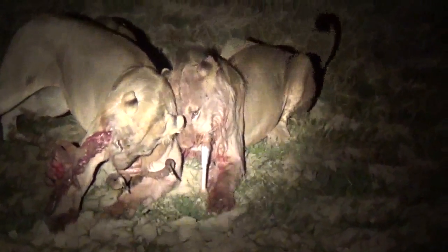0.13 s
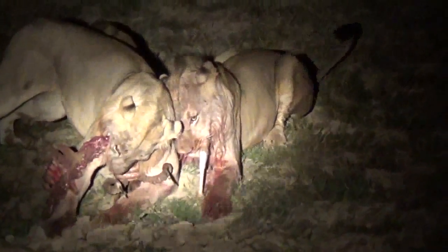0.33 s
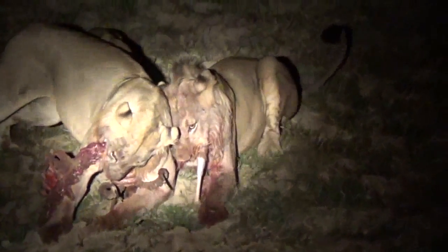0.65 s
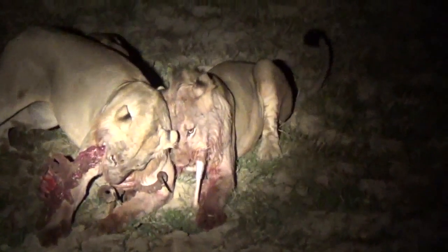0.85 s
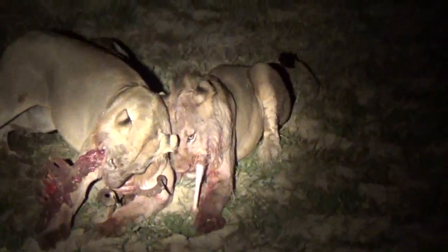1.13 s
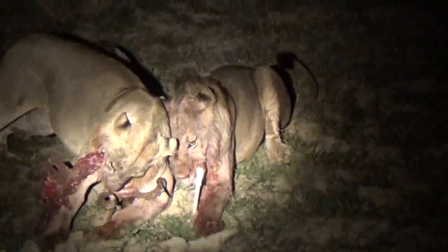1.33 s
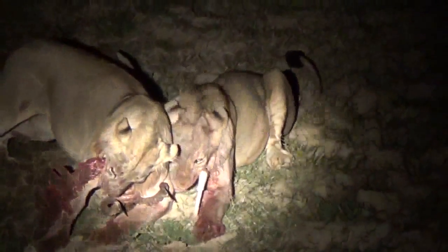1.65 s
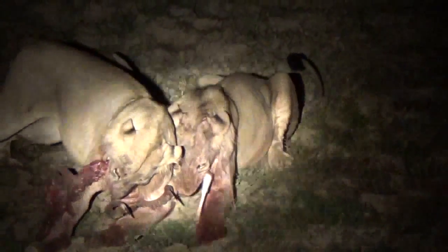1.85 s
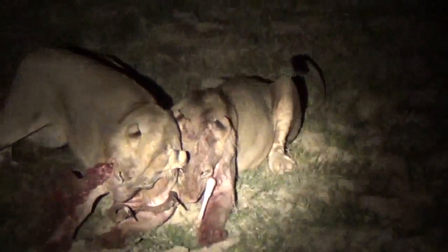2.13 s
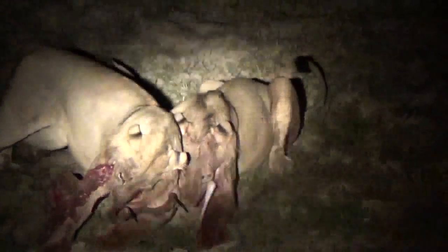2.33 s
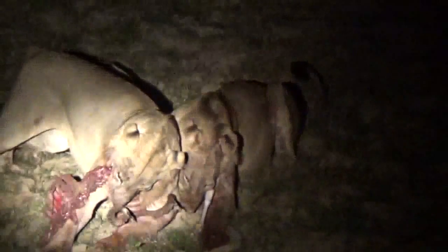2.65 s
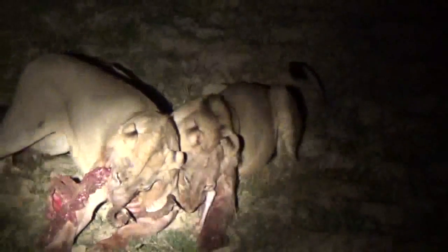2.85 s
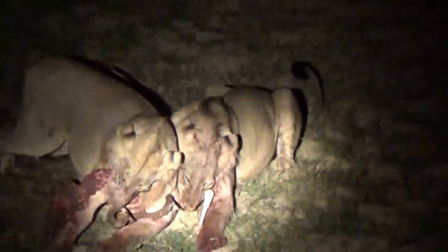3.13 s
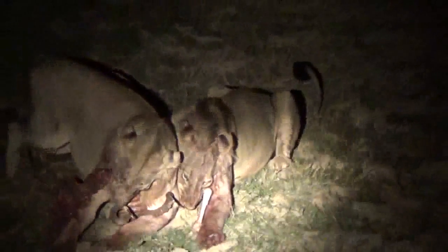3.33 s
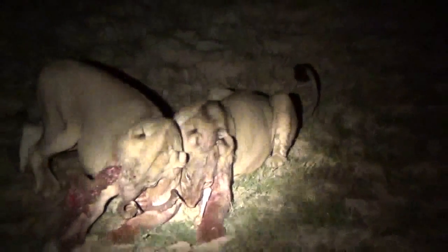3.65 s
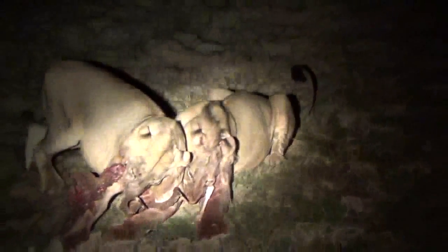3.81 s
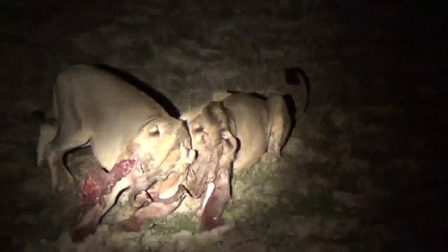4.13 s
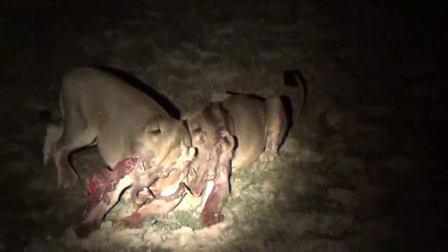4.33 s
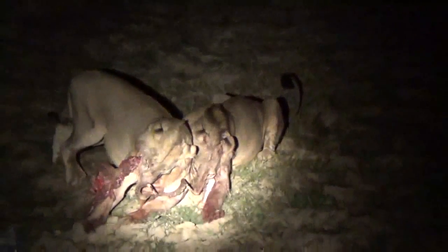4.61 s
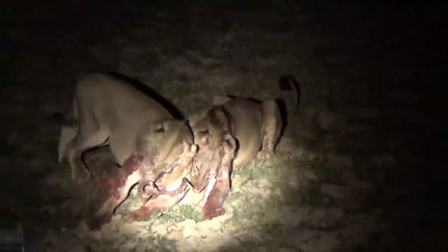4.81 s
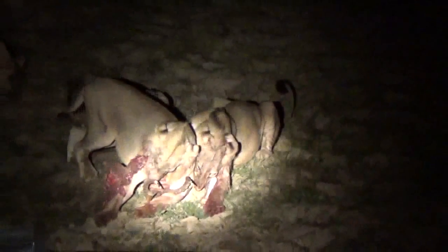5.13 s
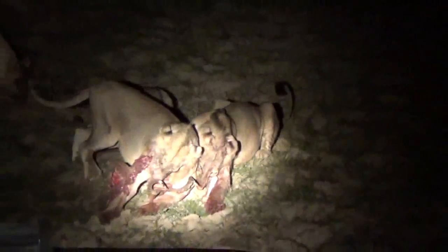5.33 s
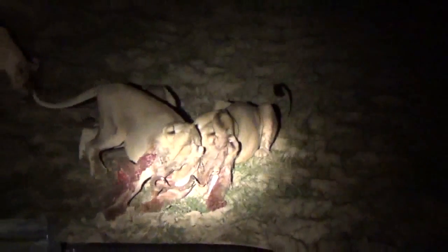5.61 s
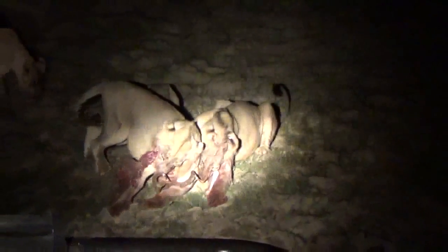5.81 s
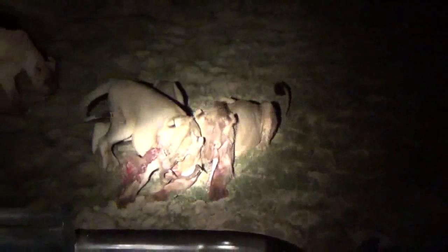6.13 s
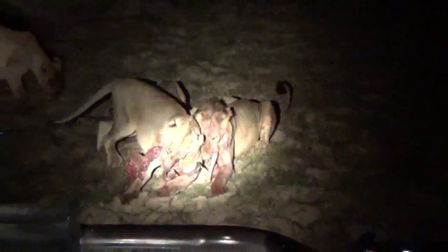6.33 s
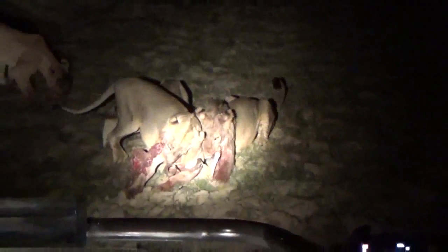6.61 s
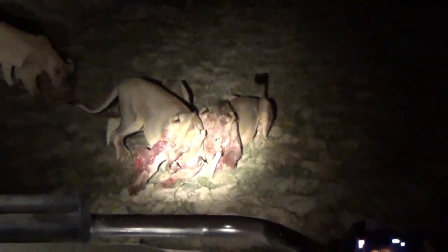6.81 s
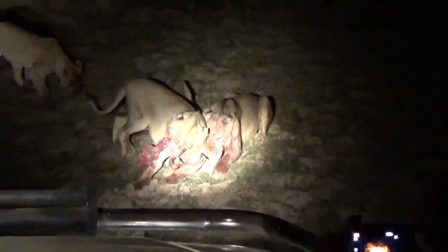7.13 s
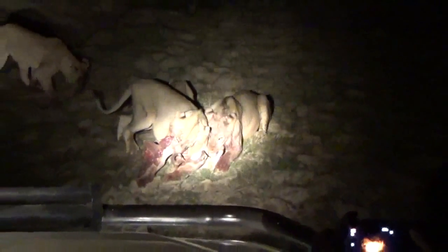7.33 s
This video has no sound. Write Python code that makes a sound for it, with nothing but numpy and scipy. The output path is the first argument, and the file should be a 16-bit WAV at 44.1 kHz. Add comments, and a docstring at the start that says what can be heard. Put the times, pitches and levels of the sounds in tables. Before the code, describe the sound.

Night in open grassland, two lions feeding straight ahead a few metres from a stereo microphone. A low rattling growl, about 26 pulses a second, fades by 0.6 s, with wet mouth pops and a crisp crack at 0.25 s. The loudest bone crack snaps at about 0.95 s, followed by a soft low grunt. From 1.9 to 3.1 s a deep, chesty growl swells and dies away. A small pop comes near 3.5 s, then scuffing and faint jaw clicks around 4 to 4.2 s. Another growl builds from 4.3 s into a short rough snarl with a thin whine at 5.2 to 5.5 s, ending in a tiny grunt. Duller bone cracks follow at 5.85 and 6.25 s, with a weak growl from 6.4 s to the end near 7.3 s. Throughout, a near cricket chirps upward at left about every 0.4 s, others chirp and trill, and high insect buzzing pulses over faint air.

```python
"""Two lions feed on one carcass in open grassland at night, straight ahead and a few metres away.
Slapping vocal folds excite chest and throat in slow growls; one short snarl adds a thin whine.
Bone cracks ring as noise bursts through resonances, mouths pop and grunt as gliding tones.
All around, crickets trill and chirp as wavering tones; a bush cricket buzzes in bouts of pulsing
noise above them, over a blur of far insects and faint night air."""
import sys
import numpy as np
from scipy import signal
from scipy.fft import rfft, irfft, next_fast_len
from scipy.io import wavfile
from scipy.ndimage import uniform_filter1d

SR = 44100
rng = np.random.default_rng(int(sys.argv[2]) if len(sys.argv) > 2 else 0)


def generate_wav(sig):
    """Save sig (samples, or channels by samples) to the path in sys.argv[1] as 16-bit PCM at SR."""
    pcm = np.round(np.clip(np.atleast_2d(sig).T, -1, 1) * 32767).astype(np.int16)
    wavfile.write(sys.argv[1], SR, pcm)


N = 328986
TIME = np.arange(N) / SR

# growls: first slap t/s, end t/s, first and last slap rate f/Hz, then belly, chest, throat rasp level/dB
GROWLS = [(-0.063, 0.57, 26.1, 35.2, -47, -47.5, -59.5), (0.721, 0.92, 27, 27, -66, -71, -75),
          (1.32, 1.86, 25, 23, -57.5, -66, -65.5), (1.936, 3.071, 27.2, 22, -46.5, -40, -53.7),
          (3.86, 4.47, 24.5, 24.5, -55, -59.5, -61.5), (4.313, 5.079, 24.5, 22.4, -49.5, -45, -57),
          (6.45, 7.248, 23, 21.4, -64, -66.5, -71)]
# resonances of the lion's body: f/Hz, width f/Hz, level/dB
BELLY_MODES = [(55.4, 34, -6), (76, 13, -13), (104.3, 11, -8)]
CHEST_MODES = [(163.7, 27, 1), (201.5, 40, 3), (215.4, 19, 1.5)]
THROAT_MODES = [(460, 244, 0.5), (1264, 50, -4), (1535, 220, 0.5), (1950, 390, 1), (2113, 110, 4),
                (3020, 440, -11.5)]
# short knock of the windpipe at each slap: f/Hz, width f/Hz, level/dB
WINDPIPE_MODES = [(330, 86, -1), (431, 60, -2)]
# mouth opened for the snarl: f/Hz, width f/Hz, level/dB
SNARL_MOUTH_MODES = [(437, 100, 2), (603, 89, 3.5), (920, 57, -0.5), (1206, 78, 2.5), (1440, 210, -1.5),
                     (2020, 380, -18)]
# course of the snarl, levels before the surges: t/s, mean voice pitch f/Hz, chest level/dB, mouth level/dB
SNARL_COURSE = [(5.155, 95.9, -77, -71), (5.18, 96.1, -62, -59), (5.22, 91.9, -54, -52.5),
                (5.26, 77, -50, -55.5), (5.33, 82, -49, -58.5), (5.38, 80, -53, -52.5),
                (5.41, 75.1, -59, -61), (5.501, 70, -57, -67.5)]
# whine that breaks out of the snarl: t/s, mean pitch f/Hz, level/dB
WHINE_COURSE = [(5.23, 587, -68), (5.29, 593, -52.5), (5.315, 640, -50), (5.34, 615, -54), (5.36, 613, -66),
                (5.376, 595, -46), (5.39, 600, -48), (5.405, 552, -64), (5.43, 555, -68)]
# soft closed-mouth grunts: t/s, length t/s, start f/Hz, end f/Hz, level/dB at the middle
GRUNTS = [(1.15, 0.18, 114, 91.4, -56), (5.499, 0.026, 127, 99, -44.5)]
# wet pops of the mouth: t/s, length t/s, start f/Hz, end f/Hz, level/dB at the middle
POPS = [(0.055, 0.022, 660, 627, -54.5), (0.25, 0.03, 695, 613, -53.5), (0.455, 0.021, 593, 583, -57),
        (3.457, 0.02, 556, 497, -54.5)]
# bone cracks and jaw smacks: t/s, crack peak level/dB, crumbling decay t/s, main ring f/Hz,
# top edge f/Hz, low thud level/dB re crack peak, bright fracture level/dB re splinters
BITES = [(0.248, -26, 0.0012, 2450, 15000, -26, 3), (0.962, -17.5, 0.0022, 864, 15000, -42, -12.5),
         (3.128, -43.5, 0.0069, 1800, 2500, -28, -9), (4.166, -40, 0.00092, 1700, 4000, -25, -11),
         (4.184, -40, 0.00077, 1600, 4000, -20, -9), (4.24, -44.5, 0.00059, 1400, 3500, -15, -9),
         (5.101, -38.5, 0.0026, 440, 940, -3, -9), (5.127, -46, 0.0013, 1900, 2500, -18, -9),
         (5.136, -44, 0.0024, 1750, 2500, 1.5, -9), (5.848, -34, 0.0042, 1320, 6050, -21, -6),
         (6.244, -32, 0.0098, 1760, 4230, -6.5, -7)]
# ring of bone and mouth: f/Hz, width f/Hz, level/dB
BONE_MODES = [(720, 480, -9.5), (1130, 490, -7.5), (1580, 260, -6.5), (2070, 205, -2.5), (2960, 280, -4),
              (3550, 280, -11), (5250, 1700, -17), (9800, 3200, -17.5)]
# paws and bodies shifting in the grass: t/s, length t/s, centre f/Hz, level/dB
SCUFFS = [(3.979, 0.17, 476, -63), (4.112, 0.17, 357, -60), (5.05, 0.12, 386, -56),
          (5.722, 0.19, 704, -63.5), (6.227, 0.13, 290, -58), (6.422, 0.7, 286, -69),
          (7.281, 0.19, 590, -61)]
# evenly spaced chirps; levels are sine peaks before swell, flicker, echo and panning
# near cricket with an upward chirp, timed at its start; it hurries a little towards the end:
# first t/s, last t/s, period t/s, level/dB
RISING_CHIRPS = [(0.0, 5.585, 0.4, -51.5), (5.98, 7.135, 0.387, -51.5)]
# farther cricket on a level note, timed at its middle: first t/s, last t/s, period t/s, level/dB
LEVEL_CHIRPS = [(0.10, 1.79, 0.42, -56.5), (2.195, 7.255, 0.42, -54.5)]
# farther cricket whose note droops, timed at its middle; it rests between two runs:
# first t/s, last t/s, period t/s, level/dB
DROOPING_CHIRPS = [(0.105, 1.71, 0.4, -54.5), (5.125, 6.77, 0.41, -55.5)]
# trilling tree crickets: mean f/Hz, mean pulse rate f/Hz, level/dB before the common trim
TRILLS = [(2325, 38.5, -65.5), (2386, 45, -63.5), (2424, 43, -63), (2464, 52, -63)]
# bouts of the bush cricket: start t/s, end t/s
BUZZ_BOUTS = [(-0.25, 0.58), (0.6, 1.48), (1.63, 2.42), (2.42, 3.35), (3.4, 4.12), (4.22, 5.17),
              (5.08, 5.94), (6.02, 6.78), (6.85, 7.6)]
# relative spectra of bush cricket, far insects, far crickets and night air: f/Hz, level/dB per Hz
BUZZ_SPECTRUM = [(7500, -20.5), (9000, -8), (9700, -2.5), (10300, 4), (11100, 2), (12000, -20)]
CHORUS_SPECTRUM = [(4800, -29), (5700, -4), (6250, 3), (6800, -0.5), (7500, -5.5), (8500, -26)]
FAR_CRICKETS_SPECTRUM = [(2000, -31), (2250, -2.5), (2450, 4.5), (2650, -21.5), (3050, -14.5),
                         (3350, -17.5), (3650, 0.5), (3950, 0), (4200, -5), (4500, -14.5), (5200, -31)]
NIGHT_SPECTRUM = [(20, -29), (50, 0.5), (110, -1.5), (220, 3.5), (400, -1), (750, 0), (1200, -5),
                  (1900, -7), (3000, -6), (5000, -9), (8500, -13.5), (11500, -13)]
# likeness of left and right in sound from all around: f/Hz, likeness (0 to 1)
LIKENESS = [(30, .999), (150, 0.84), (300, 0.64), (600, 0.15), (2000, 0.17), (4000, 0.69), (6500, 0.62),
            (9000, 0.73), (10500, 0.84)]

# the air starts to flow this long before the first slap
GROWL_LEAD_S = 0.088
# (attack s, steepness of the fade); the chest comes last and goes first
BELLY_SWELL, CHEST_SWELL, RASP_SWELL = (0.23, 1.65), (0.35, 2.64), (0.18, 0.85)
# the rattle stumbles once in the loudest growl, skipping a share of a cycle
STUMBLE_AT_S, STUMBLE_CYCLES = 2.215, 0.24
# the snarl surges at the pace of the growl's rattle
SURGE_AT_S, SURGES_PER_S = 5.218, 25.3
BUZZ_DB, BUZZ_BETWEEN_DB, BUZZ_ATTACK_S, BUZZ_RELEASE_S = -64, -74, 0.29, 0.14
# the far insect chorus wavers about a steady level
CHORUS_DB, CHORUS_WAVER_DB, CHORUS_WAVERS_PER_S = -64, 1.5, 10
CUTOFF_HZ = 11040


def growls(jitter_s=0.0006, uneven_db=1.5, flutter_db=-7, belly_flutter_db=-7, rebound_s=0.01362,
           rebound_db=-11.5, puff_s=0.0023, leak=1.2, throat_shift=0.057, knock_db=-24):
    """Slack vocal folds slap shut; each slap thumps belly, chest and windpipe and puffs air in the throat."""
    slaps, rebounds, puffs = np.zeros((3, N))
    t = TIME[:SR // 30]
    for s in slap_times():
        late, strong, shift, bounce = rng.standard_normal(4)
        s = s + jitter_s * late
        gain = from_db([uneven_db * strong])
        add(slaps, s, gain)
        # the folds touch again more lightly within each cycle
        add(rebounds, s + rebound_s, gain * from_db(rebound_db + 2.3 * bounce))
        # the soft throat has a slightly different shape at every puff
        throat = np.array(THROAT_MODES) * [np.exp(throat_shift * shift), 1, 1]
        puff = rng.standard_normal(len(t)) * t * np.exp(-t / puff_s)
        add(puffs, s, gain * rms_one(resonate(puff, throat)))
    belly_gain = growl_gain(BELLY_SWELL, column=4)
    chest_gain = growl_gain(CHEST_SWELL, column=5)
    rasp_gain = growl_gain(RASP_SWELL, column=6)

    # loose tissue flutters between the slaps, the more so when the growl is weak
    slack = np.clip((from_db(-43) / (chest_gain + 1e-6)) ** 0.6, 0.7, 3)
    flutter, hiss = rng.standard_normal((2, N))
    thumps = rms_one(slaps)
    belly = resonate(thumps + from_db(belly_flutter_db) * slack * flutter, BELLY_MODES)
    belly = cut(cut(belly, 37, "high", order=4), 127, "low")
    chest = resonate(rms_one(slaps + rebounds) + from_db(flutter_db) * slack * flutter, CHEST_MODES)
    chest = cut(chest, 259, "low", order=5)
    rasp = cut(rms_one(puffs) + leak * rms_one(resonate(hiss, THROAT_MODES)), 2470, "low")
    knock = resonate(thumps + from_db(flutter_db) * flutter, WINDPIPE_MODES)
    knock = cut(cut(knock, 190, "high"), 590, "low", order=4)
    chest_and_knock = evened(chest, 0.082) + from_db(knock_db) * evened(knock, 0.12)
    # belly and chest move in the opposite direction to the rasp
    return rasp_gain * evened(rasp, 0.071) - belly_gain * evened(belly, 0.06) - chest_gain * chest_and_knock


def slap_times():
    """The rattle's pace glides evenly through a growl, until it ends or the next one takes over."""
    times = []
    next_starts = [row[0] for row in GROWLS[1:]] + [np.inf]
    for (start, end, first_rate, last_rate, *_), next_start in zip(GROWLS, next_starts):
        span = np.arange(start, end, 1 / SR)
        cycles = np.cumsum(np.linspace(first_rate, last_rate, len(span))) / SR
        cycles += STUMBLE_CYCLES * (start < STUMBLE_AT_S) * (span > STUMBLE_AT_S)
        slaps = span[np.diff(np.floor(cycles), prepend=-1) > 0]
        times.extend(slaps[(slaps > 0) & (slaps < next_start - 0.5 / last_rate)])
    return times


def growl_gain(shape, column):
    """Every growl swells quickly and fades as the air runs out; overlapping growls add in power."""
    attack_s, fade = shape
    power = 0
    for row in GROWLS:
        onset, end = row[0] - GROWL_LEAD_S, row[1]
        spent = np.clip((TIME - onset) / (end - onset), 0, 1)
        swell = ramp((TIME - onset) / attack_s) * (1 - spent ** 2) ** fade
        power = power + (from_db(row[column]) * swell / swell.max()) ** 2
    return np.sqrt(power)


def snarl(rough=0.13, breathy=2.2, whine_rough=0.0498, overtone_db=-14, chest_surge_db=6, mouth_surge_db=3):
    """The folds tighten to a ragged low note, the mouth opens on it and a thin whine rides on top."""
    s, hz = np.array(SNARL_COURSE)[:, :2].T
    cycles = np.cumsum(np.interp(TIME, s, hz) * (1 + rough * drift(90))) / SR
    pulses = rms_one(np.diff(np.floor(cycles), prepend=0)) * from_db(2.5 * drift(86))
    # breath noise pulses with the folds
    air = rng.standard_normal(N) * (1 + np.cos(2 * np.pi * cycles) / 2)
    chest = resonate(pulses + 0.68 * air, [(81, 31, 8.5), (240, 74, -6.5)])
    chest = evened(cut(chest, 330, "low"), 0.025)
    mouth = resonate(pulses / 2 + breathy * air, SNARL_MOUTH_MODES)
    mouth = evened(cut(mouth, 2300, "low"), 0.018)

    s, hz = np.array(WHINE_COURSE)[:, :2].T
    phase = 2 * np.pi * np.cumsum(np.interp(TIME, s, hz) * (1 + whine_rough * drift(200))) / SR
    whine = np.sin(phase) + from_db(overtone_db) * np.sin(2 * phase)
    whine = whine * (1 + 0.15 * np.cos(2 * np.pi * cycles))

    surge = np.cos(2 * np.pi * SURGES_PER_S * (TIME - SURGE_AT_S))
    chest = chest * from_db(chest_surge_db * surge) * level_curve(SNARL_COURSE, column=2)
    mouth = mouth * from_db(mouth_surge_db * surge) * level_curve(SNARL_COURSE, column=3)
    return chest + mouth + rms_one(whine) * level_curve(WHINE_COURSE, column=2)


def grunts_or_pops(rows, overtone_db):
    """A closed mouth or a wet pop gives a short swelling tone that slides in pitch, with one overtone."""
    out = np.zeros(N)
    for s, length, start_hz, end_hz, db in rows:
        count = int(length * SR)
        phase = 2 * np.pi * np.cumsum(np.linspace(start_hz, end_hz, count)) / SR
        tone = np.sin(phase) + from_db(overtone_db) * np.sin(2 * phase)
        add(out, s, from_db(db) * np.sqrt(2) * np.hanning(count) * tone)
    return out


def bites(ring_db=-2, fracture_s=0.0013, ring_width_hz=300):
    """One snap rings the bone, with a bright fracture and a quick crumbling; the jaw adds a dull thud."""
    out = np.zeros(N)
    t = TIME[:SR // 8]
    for s, db, crumble_s, ring_hz, top_hz, thud_db, fracture_db in BITES:
        force, splinters = rng.standard_normal((2, len(t))) * np.exp(-t / crumble_s)
        main_ring = np.sin(2 * np.pi * ring_hz * t) * np.exp(-np.pi * ring_width_hz * t)
        fracture = cut(rng.standard_normal(len(t)) * np.exp(-t / fracture_s), 840, "high")
        # neighbouring resonances ring with opposite sign
        crack = rms_one(resonate(splinters, BONE_MODES[::2]) - resonate(splinters, BONE_MODES[1::2]))
        crack = crack + from_db(ring_db) * rms_one(main_ring) + from_db(fracture_db) * rms_one(fracture)
        crack = cut(cut(crack, top_hz, "low", order=3), 480, "high", order=3)
        thud = resonate(force, [(151, 78, -4), (267, 100, -3.5), (397, 53, -2)])
        bite = crack / np.abs(crack).max() + from_db(thud_db) * thud / np.abs(thud).max()
        add(out, s, from_db(db) * bite)
    return out


def scuffs(spread=0.45, grain_db=3):
    """Dull, uneven rubbing of fur and pads on the ground: grainy noise through a double resonance."""
    out = np.zeros(N)
    for s, length, hz, db in SCUFFS:
        count = int(length * SR)
        band = [(hz, spread * hz, 0)]
        rub = rng.standard_normal(count) * from_db(grain_db * drift(68)[:count])
        rub = rms_one(resonate(resonate(rub, band), band))
        add(out, s, from_db(db) * np.hanning(count) * rub)
    return out


def chirps(start_hz=3835, end_hz=4045, length_s=0.1021, far_length_s=0.15):
    """Three crickets chirp at their own paces: a near one sweeps upward, one holds its note, one droops."""
    count = int(length_s * SR)
    near_swell = signal.windows.tukey(count, 0.3) * from_db(np.linspace(1.5, -2, count))
    near = chirp_song(RISING_CHIRPS, start_hz, end_hz, near_swell, lead_s=0)
    far_swell = np.sqrt(np.hanning(int(far_length_s * SR)))
    holding = chirp_song(LEVEL_CHIRPS, 3716, 3716, far_swell, lead_s=far_length_s / 2)
    drooping = chirp_song(DROOPING_CHIRPS, 3845, 3765, far_swell, lead_s=far_length_s / 2)
    far = from_db(2.5) * scatter(holding + drooping, wet_db=-4.5, t60=0.52)
    return pan(scatter(near, wet_db=-3, t60=0.46), left_db=9) + pan(far, left_db=-1.5)


def chirp_song(rows, first_hz, last_hz, swell, lead_s, waver_hz=8, flicker_db=1.8):
    """A cricket repeats one wavering, sweeping tone at an even pace while its level flickers."""
    out = np.zeros(N)
    sweep = np.linspace(first_hz, last_hz, len(swell))
    for first, last, period, db in rows:
        for s in np.linspace(first, last, round((last - first) / period) + 1):
            hz = sweep + waver_hz * drift(242)[:len(swell)]
            tone = np.sin(2 * np.pi * np.cumsum(hz) / SR)
            add(out, s - lead_s, from_db(db) * swell * tone)
    return out * from_db(flicker_db * drift(200))


def trills(sag_hz=70, waver_hz=35, uneven_db=1.5):
    """Each wing stroke is a short tone that sags in pitch; several crickets overlap."""
    out = 0
    for hz, rate, db in TRILLS:
        cycles = np.cumsum(rate * (1 + 0.043 * drift(4))) / SR + rng.random()
        stroke = cycles % 1
        pitch = hz + sag_hz * (1 - 2 * stroke) + waver_hz * drift(120)
        tone = np.sin(2 * np.pi * np.cumsum(pitch) / SR)
        pulses = rms_one(tone * np.sin(np.pi * stroke) ** 2)
        out = out + from_db(db + uneven_db * drift(40)) * pulses
    return pan(scatter(out, wet_db=-12, t60=0.094), left_db=0.5) * from_db(-2.5)


def bush_cricket(stroke_rate=27, depth=0.24):
    """Wing strokes pulse a band of high noise that swells and sinks in bouts."""
    strokes_hz = stroke_rate * (1 + 0.024 * drift(3.35))
    strokes = 1 + depth * np.sin(2 * np.pi * np.cumsum(strokes_hz) / SR)
    bouts = 0
    for start, end in BUZZ_BOUTS:
        bouts = bouts + ramp((TIME - start) / BUZZ_ATTACK_S) * ramp((end - TIME) / BUZZ_RELEASE_S)
    gain = np.hypot(from_db(BUZZ_DB) * bouts, from_db(BUZZ_BETWEEN_DB))
    return pan(gain * strokes * wide_noise(BUZZ_SPECTRUM), left_db=-0.8)


def far_insects():
    """Insects too far to tell apart blur into two bands of noise that waver in level."""
    chorus_gain = from_db(CHORUS_DB + CHORUS_WAVER_DB * drift(CHORUS_WAVERS_PER_S))
    chorus = chorus_gain * wide_noise(CHORUS_SPECTRUM)
    crickets = from_db(-57 + 1.67 * drift(30)) * wide_noise(FAR_CRICKETS_SPECTRUM)
    return pan(chorus + crickets, left_db=1.8)


def night_air():
    """Faint, steady broadband noise from all around."""
    return from_db(-58) * wide_noise(NIGHT_SPECTRUM)


def wide_noise(spectrum):
    """Stereo noise from all around, alike in both ears in the bass, at unit power."""
    size = next_fast_len(N)
    log_hz = np.log(np.arange(size // 2 + 1) * SR / size + 1)

    def curve(points):
        hz, value = np.array(points).T
        return np.interp(log_hz, np.log(hz), value)

    alike = np.clip(curve(LIKENESS), 0, 1)
    mid, side = rfft(rng.standard_normal((2, size)))
    ears = np.sqrt(1 + alike) * mid + np.sqrt(1 - alike) * side * [[1], [-1]]
    return rms_one(irfft(from_db(curve(spectrum)) * ears, size)[:, :N])


def scatter(x, wet_db, t60):
    """Ground and bushes throw back a short diffuse tail, different for each ear, with little bass."""
    t = TIME[:SR // 2]
    tail = cut(rng.standard_normal((2, len(t))), 390, "high") * from_db(-60 * t / t60) * (t > 0.002)
    tail /= np.sqrt(np.sum(tail ** 2, axis=1, keepdims=True))
    return x + from_db(wet_db) * signal.fftconvolve(x[None], tail, axes=1)[:, :N]


def pan(x, left_db):
    """Lean a sound to the left, or to the right if negative."""
    return x * from_db([[left_db / 2], [-left_db / 2]])


def resonate(x, modes):
    """Ring parallel resonances of (Hz, width Hz, dB)."""
    out = 0
    for hz, width, db in modes:
        r = np.exp(-np.pi * width / SR)
        poles = [1, -2 * r * np.cos(2 * np.pi * hz / SR), r * r]
        ring = signal.lfilter([1, 0, -1], poles, x + 1e-18)
        out = out + from_db(db) * (1 - r * r) / 2 * ring
    return out


def cut(x, hz, kind, order=2):
    """Butterworth low- or high-pass."""
    sos = signal.butter(order, np.clip(hz, 10, 0.45 * SR), kind, fs=SR, output="sos")
    return signal.sosfilt(sos, x + 1e-18)


def evened(x, span_s):
    """Bring every short stretch close to unit power."""
    size = max(int(span_s * SR), 8)
    power = np.abs(uniform_filter1d(uniform_filter1d(x ** 2, size), size))
    return x / np.sqrt(power + 0.0055 * np.mean(x ** 2))


def rms_one(x):
    """Scale to unit power."""
    return x / np.sqrt(np.mean(x ** 2) + 1e-20)


def from_db(db):
    """Decibels to gain."""
    return 10 ** (np.asarray(db) / 20)


def level_curve(rows, column):
    """Gain along a dB curve, practically silent outside it."""
    rows = np.array(rows)
    return from_db(np.interp(TIME, rows[:, 0], rows[:, column], left=-120, right=-120))


def drift(rate):
    """Smooth chance of about unit spread, with `rate` new values per second."""
    knots = rng.standard_normal(4000)
    return 1.2 * np.interp(TIME * rate, np.arange(len(knots)), knots)


def ramp(share):
    """Smooth rise from 0 to 1."""
    return np.sin(np.pi / 2 * np.clip(share, 0, 1)) ** 2


def add(track, s, sound):
    """Mix a sound in at a time in seconds."""
    at = int(np.clip(s * SR, 0, N - 1))
    track[at:at + len(sound)] += sound[:N - at]


def scene():
    """Lions straight ahead, insects and faint night air all around."""
    voices = growls() + snarl()
    mouths = grunts_or_pops(GRUNTS, overtone_db=-16) + grunts_or_pops(POPS, overtone_db=-23)
    lions = scatter(voices + mouths + scuffs(), wet_db=-13, t60=0.32)
    feeding = pan(scatter(bites(), wet_db=-4.5, t60=0.034), left_db=0.5)
    insects = chirps() + trills() + bush_cricket() + far_insects()
    return lions + feeding + insects + night_air()


def record(dry):
    """The top is cut steeply by an elliptic low-pass."""
    return signal.sosfilt(signal.ellip(12, 0.2, 80, CUTOFF_HZ, fs=SR, output="sos"), dry)


dry = scene()
out = record(dry)
generate_wav(out)
```